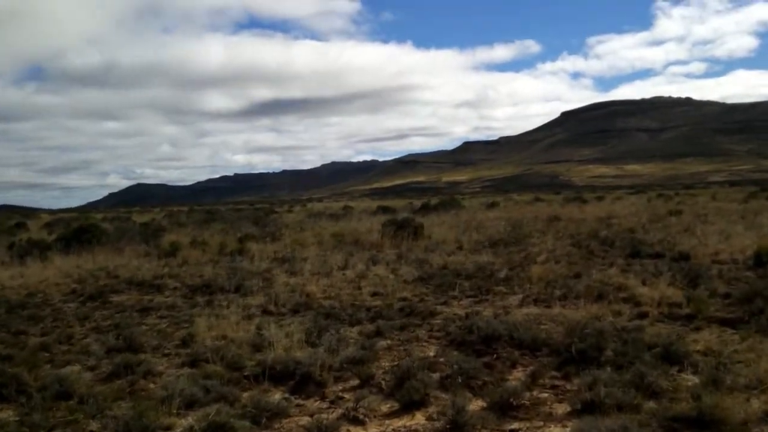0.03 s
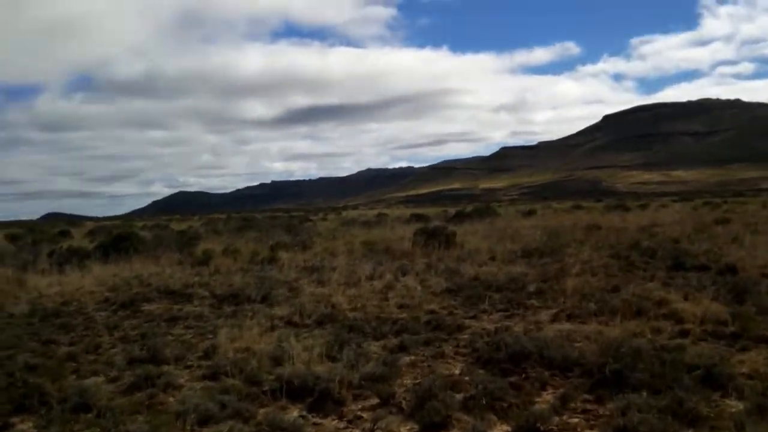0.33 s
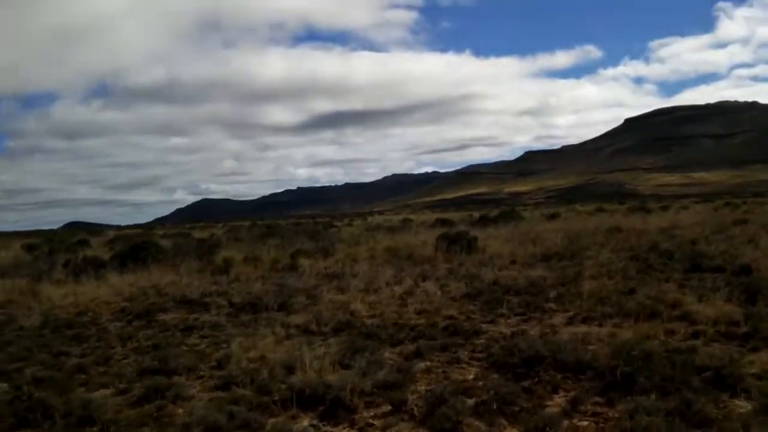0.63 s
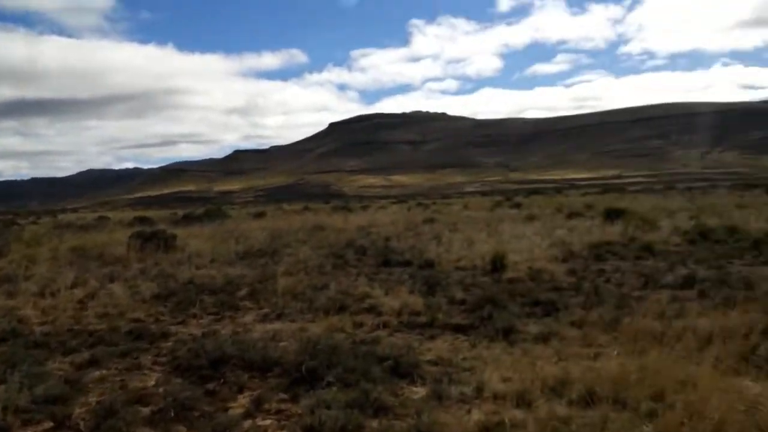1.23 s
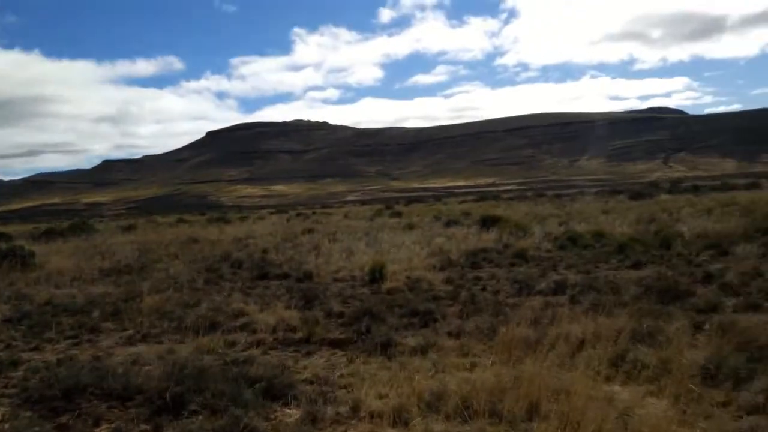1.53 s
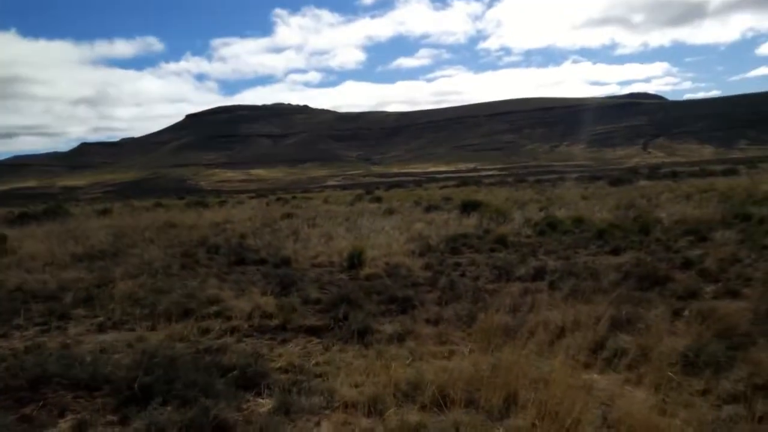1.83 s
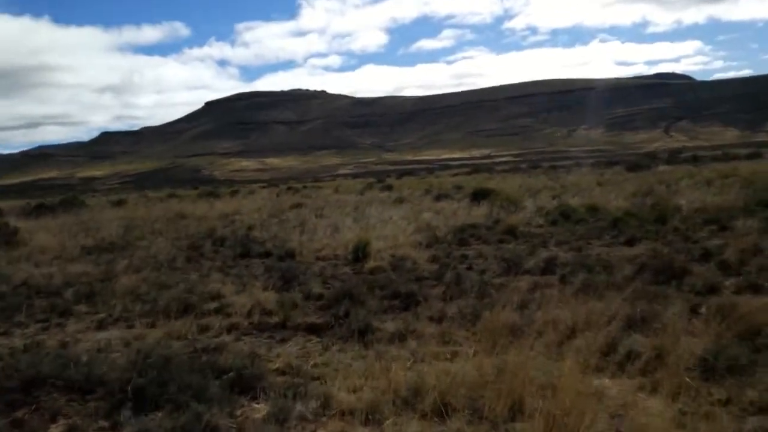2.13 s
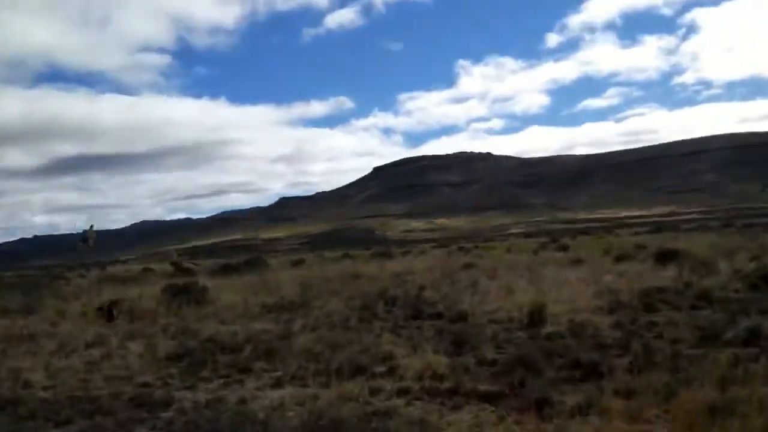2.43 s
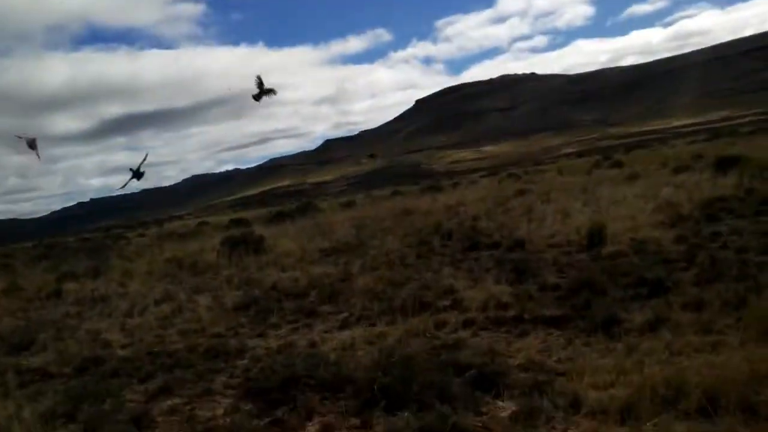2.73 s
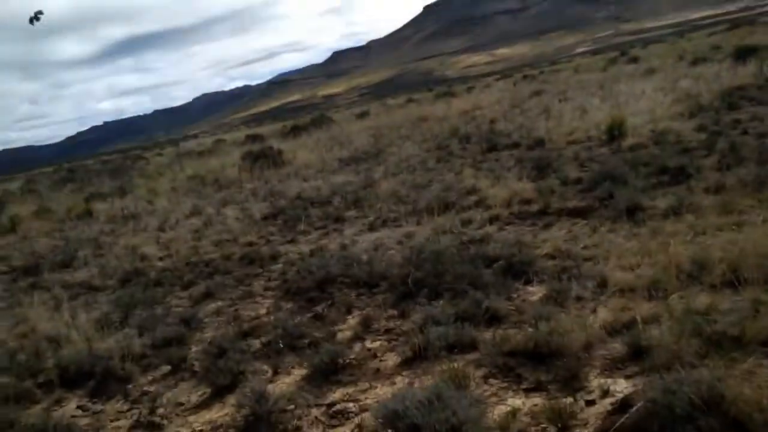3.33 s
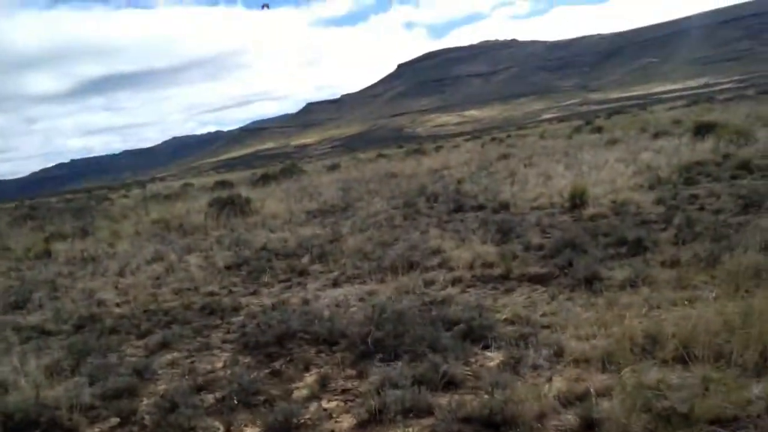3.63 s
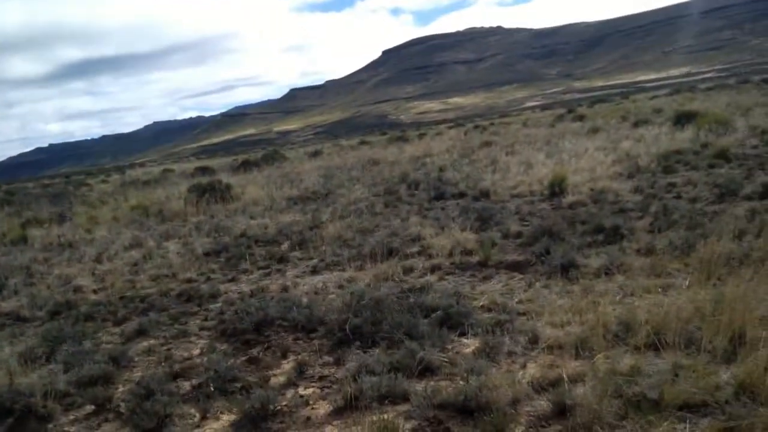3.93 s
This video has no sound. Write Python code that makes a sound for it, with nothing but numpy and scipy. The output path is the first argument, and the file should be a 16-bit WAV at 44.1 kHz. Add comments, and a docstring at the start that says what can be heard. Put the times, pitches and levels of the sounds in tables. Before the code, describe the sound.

Two loud, close gunshots end the scene in open scrubland. Before them, wind gusts buffet the microphone and dry grass rustles, then a flock of birds bursts up with clapping wings and shrill squeals.

```python
"""Open scrubland at the two ports of a hand-held microphone. First, turbulent gusts buffet the ports while
dry grass rustles and snaps. At about 2 s a covey of birds bursts up: wing strokes clap the air, feathers
whirr and shrill squeals overlap. At 3.5 s and 3.9 s two close gunshots set the ports ringing and
overload the microphone; each blast rolls back as a reflection from the slopes."""
import sys
import numpy as np
from scipy import signal
from scipy.fft import rfft, irfft
from scipy.io import wavfile
from scipy.ndimage import uniform_filter1d, map_coordinates

SR = 44100
rng = np.random.default_rng(int(sys.argv[2]) if len(sys.argv) > 2 else 0)


def file_out(sig):
    """Save sig as 16-bit WAV at sys.argv[1]."""
    # one column per channel
    cols = np.atleast_2d(sig).T
    # limit, then scale
    lim = np.clip(cols, -1, 1)
    pcm = np.round(lim * 32767).astype(np.int16)
    wavfile.write(sys.argv[1], SR, pcm)


N = 176400
T = np.arange(N) / SR
BINS_HZ = np.arange(N // 2 + 1) * SR / N

def undb(db):
    """Amplitude ratio of a level in decibels."""
    return 10 ** (np.asarray(db) / 20)

def unit(x):
    """Normalisation to rms 1."""
    return x / np.sqrt(np.mean(x ** 2))

def even(x, size):
    """Division by the running rms over `size` samples steadies a noise."""
    return x / np.sqrt(uniform_filter1d(np.mean(x ** 2, axis=0), size=size))

def curve(rows, column=1):
    """Linear interpolation of a table column in time."""
    rows = np.array(rows)
    return np.interp(T, rows[:, 0], rows[:, column])

def colour(x, spectrum):
    """Spectral shaping by (f/Hz, level/dB) points, conserving the power of white noise."""
    hz, db = np.array(spectrum).T
    gain = undb(np.interp(np.log(np.maximum(BINS_HZ, 1)), np.log(hz), db))
    return irfft(rfft(x) * unit(gain), N)

def noise(spectrum, correlation=0):
    """Partially coherent coloured noise at the two ports."""
    white = rng.standard_normal((3, N))
    return colour(np.sqrt(1 - correlation) * white[:2] + np.sqrt(correlation) * white[2], spectrum)

def walk(rate):
    """Smooth random modulation of rms 1, through `rate` values a second."""
    steps, coarse = rng.standard_normal(4000), T[::16]
    return unit(np.interp(T, coarse, map_coordinates(steps, [coarse * rate], order=3, mode="wrap")))

def flicker(rate, depth_db):
    """Bounded random amplitude modulation of rms 1."""
    return unit(undb(depth_db * np.tanh(walk(rate))))

def patchy(x, centres_hz, rate, depth_db):
    """Independent amplitude modulation of neighbouring bands."""
    spectrum = rfft(x)
    bands = (irfft(spectrum * np.interp(BINS_HZ, centres_hz, row), N) for row in np.eye(len(centres_hz)))
    return sum(band * unit(undb(depth_db * walk(rate))) for band in bands)

def swell(s, rise, hold, fall):
    """Envelope: exponential growth until time s, a plateau, exponential decay."""
    return np.exp(np.minimum(T - s, 0) / rise - np.maximum(T - s - hold, 0) / fall)

def bump(s, width):
    """Gaussian envelope centred on time s."""
    return np.exp(-.5 * ((T - s) / width) ** 2)

def swing(s, hz):
    """Bipolar pressure pulse of peak 1: rarefaction, then compression."""
    u = 2 * np.pi * hz * (T - s)
    return u * np.exp(.5 - .5 * u ** 2)

def ports(x, lag_s):
    """Path difference: a positive lag delays the right port."""
    return np.array([x, map_coordinates(x, [(T - lag_s) * SR], order=3)])

# Gust envelopes: t/s, relative rumble level/dB, relative buffet level/dB
GUSTS = [(0, -21.5, -30.5), (.14, -35, -41), (.23, -21.5, -22.5), (.32, -32.5, -44), (.45, -24, -28),
         (.56, -24.5, -24), (.65, -29.5, -41.5), (.74, -25.5, -25), (.92, -23.5, -24.5), (1.05, -22, -25),
         (1.22, -27.5, -38), (1.41, -27.5, -40.5), (1.47, -35, -51), (1.55, -28, -40), (1.63, -32, -49.5),
         (1.79, -34, -46), (1.87, -41, -53), (2.05, -38, -43.5), (2.22, -32, -35.5), (2.62, -28.5, -36.5),
         (2.84, -29, -44), (2.91, -23, -27.5), (3.11, -35.5, -47.5), (3.27, -32.5, -37.5), (3.5, -41, -62),
         (3.59, -56, -55), (3.74, -30, -31.5), (3.95, -41.5, -38)]
# Single eddies: t/s, relative level/dB
THUMPS = [(0.18, -42), (.212, -33.5), (0.255, -24), (0.348, -34), (0.455, -32), (0.485, -26.5), (.695, -31),
          (0.717, -20), (0.758, -17), (.818, -24), (0.848, -19), (0.906, -18.5), (0.95, -20), (1.014, -15),
          (1.073, -18), (1.11, -23.5), (1.195, -43), (1.333, -32), (1.668, -29.5)]
# Wind spectra: f/Hz, relative level/dB
RUMBLE_SPECTRUM = [(12, -23.5), (25, -14.5), (45, -0.5), (90, -2), (140, -6.5), (220, -13), (400, -42.5),
                   (900, -92)]
BUFFET_SPECTRUM = [(70, -34.5), (130, -6), (200, 1), (320, -0.5), (480, -11), (800, -26), (1400, -47),
                   (2900, -55.5), (3800, -67), (9000, -76), (15000, -77)]
THUMP_SPECTRUM = [(30, -9.5), (90, 1.5), (200, 3), (380, 0), (550, -8.5), (900, -26), (1500, -46.5),
                  (4000, -74)]
AIR_SPECTRUM = [(100, 6), (600, 0), (1500, -9.5), (3000, -21), (5000, -28), (10000, -30.5), (15000, -36.5)]

def wind():
    """Turbulent pressure fluctuations, partly independent at each port, over a steady rush of air."""
    eddy_drive = 0.74 * walk(60) + 0.79 * np.array([walk(110), walk(110)])
    eddies = unit(undb(7.5 * np.tanh(eddy_drive)))
    rumble = even(noise(RUMBLE_SPECTRUM, correlation=0.13), size=3000) * undb(curve(GUSTS) + 6.5)
    rumble *= flicker(rate=30, depth_db=3.1)
    buffet = even(noise(BUFFET_SPECTRUM, correlation=0.25), size=1500) * undb(curve(GUSTS, 2) + 2.5)
    impacts = sum(undb(db + 3.5) * swell(s, rise=0.004, hold=0.0049, fall=0.011) for s, db in THUMPS)
    thumps = even(noise(THUMP_SPECTRUM, correlation=0.31), size=500) * impacts
    return rumble + buffet * eddies + thumps + noise(AIR_SPECTRUM) * undb(-53.5)

# Grass brushing past: t/s, Gaussian width/s, relative level/dB
SCUFFS = [(0.247, 0.055, -56.5), (0.378, 0.055, -56.5), (0.521, 0.025, -52), (0.788, 0.021, -64.5),
          (.93, 0.038, -58), (1.03, 0.02, -53), (1.13, 0.038, -59), (1.25, 0.022, -50), (1.384, 0.039, -55),
          (1.453, 0.013, -53.5), (2.01, 0.038, -56.5), (2.316, 0.052, -36.5)]
# Rustle spectrum: f/Hz, relative level/dB
GRASS_SPECTRUM = [(600, 4), (1400, 2.5), (2000, -4), (2900, -3), (3500, -16.5), (6000, -29), (12000, -31),
                  (16000, -37)]

def grass(blades_per_s=1100):
    """Shot noise: random impulses from dry blades add up to uneven crunches."""
    grains = unit(rng.standard_normal((2, N)) * (rng.random(N) < blades_per_s / SR))
    rustle = patchy(colour(grains, GRASS_SPECTRUM), np.linspace(1200, 3600, 6), rate=35, depth_db=4)
    envelope = sum(undb(db + 2) * bump(s, width) for s, width, db in SCUFFS)
    return rustle * flicker(rate=120, depth_db=1.5) * envelope

# Dry stems snapping: t/s, centre f/Hz, level/dB
SNAPS = [(0.173, 1350, -40), (0.443, 1920, -53), (1.04, 6060, -57.5), (1.094, 2530, -54),
         (1.234, 4180, -50), (1.237, 1900, -51), (1.459, 2700, -51), (1.586, 5800, -61.5),
         (1.737, 1500, -50), (1.761, 1440, -56), (1.98, 4200, -51), (1.98, 2010, -41.5),
         (2.099, 5500, -41.5), (2.136, 5300, -49)]

def stems():
    """Brittle fracture: each stem gives a rapidly damped burst of narrow-band noise."""
    out = 0
    for s, hz, db in SNAPS:
        peak = [(hz / 2, -19), (hz * 0.79, -13), (hz, 0), (hz * 1.2, -15), (hz * 2, -28), (hz * 4, -46)]
        out += noise(peak, correlation=0.5) * undb(db) * swell(s, rise=0.00034, hold=0.0011, fall=0.0052)
    return out

# Wing claps: t/s, relative level/dB
CLAPS = [(2.041, -43.5), (2.094, -30), (2.125, -49), (2.151, -29.5), (2.237, -28.5), (2.264, -36),
         (2.295, -27), (2.325, -23.5), (2.353, -25), (2.375, -34), (2.396, -25), (2.442, -23.5),
         (2.453, -23.5), (2.494, -28), (2.51, -18.5), (2.527, -29), (2.549, -31), (2.567, -26),
         (2.611, -29), (2.626, -33), (2.647, -21.5), (2.666, -28), (2.706, -27.5), (2.724, -28),
         (2.766, -29), (2.795, -27.5), (2.826, -25), (2.856, -30.5), (2.887, -33.5), (2.916, -32.5),
         (2.948, -32), (2.972, -28.5), (3.007, -26.5), (3.029, -25), (3.07, -27.5), (3.081, -33),
         (3.091, -24.5), (3.137, -27), (3.152, -34), (3.196, -28.5), (3.253, -31.5), (3.273, -30.5),
         (3.314, -29.5), (3.33, -32.5), (3.372, -33.5), (3.388, -29), (3.417, -38), (3.447, -30.5),
         (3.472, -28)]
# Whirr of the covey: t/s, level/dB
WHIRR = [(1.9, -71), (2.08, -44), (2.2, -35), (2.32, -37), (2.6, -36), (2.95, -41), (3.17, -43),
         (3.45, -41), (4, -44)]
# Wing spectra: f/Hz, relative level/dB
SLAP_SPECTRUM = [(100, -11), (250, -4.5), (450, -16.5), (650, 8.5), (900, 7), (1100, -4), (1400, -11),
                 (2300, -18), (5000, -22.5), (7200, -33), (8800, -63)]
FEATHER_SPECTRUM = [(120, -8), (250, 9.5), (550, 1), (950, 7), (1400, -6.5), (2200, -2.5), (4000, -17.5),
                    (6800, -18.5), (8200, -47), (14000, -50)]

def wings(clap_hz=932, width_s=0.0021):
    """Impulsive air displacement: each downstroke radiates a wave packet and a slap, over feather noise."""
    packets = np.zeros(N)
    for (s, db), (detune, phase) in zip(CLAPS, rng.uniform(-1.03, 1, (len(CLAPS), 2))):
        hz = clap_hz * (1 + 0.15 * detune)
        carrier = np.sqrt(2) * np.sin(2 * np.pi * hz * (T - s) + np.pi * phase)
        packets += undb(db - 2.5) * bump(s, width_s) * carrier
    feathers = noise(FEATHER_SPECTRUM, correlation=0.5)
    flutter = patchy(feathers, np.geomspace(500, 8000, 5), rate=110, depth_db=4)
    whirr = flutter * flicker(rate=110, depth_db=4) * undb(curve(WHIRR))
    strokes = sum(undb(db - 7.5) * bump(s, 0.0033) for s, db in CLAPS)
    slaps = even(noise(SLAP_SPECTRUM, correlation=0.81), size=300) * strokes
    return ports(packets, lag_s=-0.000043) + slaps + whirr

def squeal(start, length, pitches, rough, octave_db):
    """Random frequency and amplitude modulation roughen a gliding tone and its second harmonic."""
    u = np.arange(int(length * SR)) / int(length * SR)
    rough = np.clip(rough, 0, 1)
    jitter, shimmer = [np.interp(u * length * 700, np.arange(200), r)
                       for r in rng.standard_normal((2, 200))]
    glide_hz = np.polyval(np.polyfit([0, .5, 1], pitches, 2), u)
    phase = 2 * np.pi * np.cumsum(glide_hz * (1 + 0.045 * rough * jitter)) / SR
    tone = np.sqrt(2) * (np.sin(phase) + undb(octave_db) * np.sin(2 * phase))
    out, i = np.zeros(2 * N), int(start * SR)
    out[i:i + len(u)] = tone * np.sin(np.pi * u) ** 0.52 * (1 + 0.9 * np.sqrt(rough) * shimmer)
    return out[:N]

# Near cries: t/s, duration/s, start, middle and end f/Hz, relative level/dB, roughness, octave level/dB
SQUEALS = [(2.356, 0.0507, 3100, 3440, 3420, -32, 0.67, -0.5),
           (2.37, .036, 3747, 3950, 3820, -29, 0.1, -23), (2.416, .05, 4260, 3900, 3780, -34, 0.8, -27),
           (2.528, 0.035, 4070, 4080, 3560, -34.5, .3, -1),
           (2.529, 0.066, 4550, 4420, 4280, -29.5, 0.5, -24),
           (2.607, 0.035, 4020, 3920, 4020, -16.5, 0, -11.5),
           (2.644, 0.028, 4590, 4460, 3980, -30.5, 1.1, -21),
           (2.674, 0.046, 3646, 3420, 3380, -29.5, .5, -2), (2.688, 0.049, 4300, 4010, 3470, -32, .8, -26),
           (2.777, 0.037, 3800, 4020, 4020, -32, 0.34, -18),
           (2.838, .035, 4690, 4350, 4570, -27.5, 0.3, -17),
           (2.878, 0.021, 5030, 4910, 4920, -21, 0.1, -12), (2.901, 0.027, 3755, 3783, 4110, -25, .2, -1),
           (2.923, .045, 4480, 4460, 4540, -31, 0.7, -15),
           (2.972, 0.057, 3610, 3430, 3500, -33.5, 0.46, -12),
           (3.057, 0.019, 4180, 4150, 4120, -23.5, 0.4, -2), (3.08, .042, 4180, 4030, 3870, -21, .15, -8),
           (3.182, 0.044, 4060, 4100, 4280, -35, 0.2, -18), (3.253, .045, 3420, 3350, 3450, -33.5, 0.74, 4),
           (3.276, .045, 3800, 4070, 4380, -29, .6, 1), (3.319, 0.037, 4200, 4050, 4080, -24, 0.31, -17),
           (3.339, 0.034, 4400, 4690, 4280, -23.5, 0.07, -21),
           (3.353, .035, 4100, 3710, 3040, -34, 0.58, -16), (3.474, 0.076, 4300, 4320, 4400, -28, .5, -22),
           (3.465, 0.069, 3790, 3700, 3650, -31.5, 0.45, 0.5),
           (3.618, 0.051, 4600, 4520, 4360, -40, 0.4, -20), (3.737, 0.069, 4440, 4290, 4270, -27, 0.2, -22),
           (3.8, 0.087, 4480, 4570, 4400, -30, 0, -24)]
# Thin high cries: t/s, duration/s, start, middle and end f/Hz, level/dB
SQUEAKS = [(2.661, 0.063, 10700, 10540, 10300, -60.5), (2.835, 0.053, 10900, 11260, 11800, -66),
           (3.029, 0.04, 10250, 10200, 10200, -63)]
# Envelope of the rest of the covey: t/s, relative level/dB
CHATTER = [(2.13, -67), (2.21, -32.5), (2.26, -32.5), (2.3, -50), (2.385, -34.5), (2.48, -30.5),
           (2.58, -27.5), (2.68, -28.5), (2.76, -33), (2.86, -28.5), (2.95, -27), (3.03, -31),
           (3.125, -32.5), (3.165, -43.5), (3.2, -38), (3.24, -33), (3.3, -31), (3.43, -35), (3.49, -29.5),
           (3.58, -40), (3.69, -43), (3.73, -26), (3.77, -41.5), (3.82, -32), (3.94, -52), (4, -38)]
# Treble roll-off that dulls the cries above about 8.5 kHz: f/Hz, relative level/dB
CRY_TREBLE_CUT = [(2000, 11), (5000, 1.5), (8400, -7), (9000, -24), (10000, -32), (14000, -43)]
# Hoarse noise spectrum: f/Hz, relative level/dB
HOARSE_SPECTRUM = [(1800, -32), (2600, -1), (3100, 4.5), (4000, 7.5), (4700, 3), (5300, -5), (7200, -9),
                   (8300, -51), (9500, -59)]

def birds(chatter_hz=3695, cry_s=0.047):
    """Incoherent superposition: many rough cries merge into hoarse chatter behind the near squeals."""
    near = sum(undb(db - 5.5) * squeal(s, length, pitches, rough, octave_db)
               for s, length, *pitches, db, rough, octave_db in SQUEALS)
    thin = sum(undb(db) * squeal(s, length, pitches, rough=0.24, octave_db=-40)
               for s, length, *pitches, db in SQUEAKS)
    starts = np.linspace(CHATTER[0][0], CHATTER[-1][0], 36)
    crowd = 0
    for lag_s in (-.00014, .00012, .00028):  # three directions
        cries = 0
        for s in starts:
            shift, stretch, detune = rng.uniform(-1, 1, 3)
            pitches = chatter_hz * np.exp(0.24 * detune + 0.085 * rng.uniform(-1, 1, 3))
            length = cry_s * (1 + 0.322 * stretch)
            cries += squeal(s + .02 * shift, length, pitches, rough=0.92, octave_db=-11)
        crowd += ports(cries, lag_s)
    hiss = noise(HOARSE_SPECTRUM, correlation=0.05)
    hoarse = patchy(hiss, np.linspace(2500, 8000, 8), rate=70, depth_db=4.5)
    envelope = undb(curve(CHATTER)) * (T > CHATTER[0][0])
    voices = ports(near, lag_s=-0.000038) + envelope * unit(crowd) * undb(-5) / np.sqrt(2)
    return colour(voices, CRY_TREBLE_CUT) + thin + envelope * hoarse * undb(-6.5)

# Modes of the overloaded ports, one list per shot: f/Hz, left level/dB, right level/dB
PORT_MODES = [
    [(498, -12.5, -35), (800, -31, -22), (1120, -42, -16), (1360, -44, -14), (1664, -27, -27),
     (1930, -51, -17.5), (2440, -40, -31), (4800, -18.5, -45), (6100, -28, -44), (6700, -46, -23.5),
     (12000, -25, -40)],
    [(199.1, -26, -16.5), (2046, -21.5, -39), (4025, -12, -37), (4430, -17.5, -38), (7450, -37, -57)],
]

def port_ringing(shot, front):
    """Resonance: the shock front excites wavering modes, of different strength at each port."""
    ring = 0
    for hz, left_db, right_db in PORT_MODES[shot]:
        phase = 2 * np.pi * (hz * T + rng.random()) + 0.55 * walk(300)
        ring += undb([[left_db], [right_db]]) * np.sqrt(2) * np.sin(phase)
    return ring * swell(front, rise=0.004, hold=0.0208, fall=0.0013)

# Spectrum of the reflected blast: f/Hz, relative level/dB
ROLL_SPECTRUM = [(60, -38), (130, -8), (230, 0.5), (360, -7), (550, -4), (800, -10), (1150, -15),
                 (1700, -32.5), (4500, -33.5), (9000, -34.5), (15000, -49.5)]

def reflections(s, hold, delay_s=0.097):
    """Reflection: ground reverberation and the slopes' echo add in power; a bright slap marks the echo."""
    ground = undb(-23.5) * swell(s, rise=0.0058, hold=hold, fall=0.14)
    slopes = undb(-20.5) * swell(s + delay_s, rise=0.018, hold=0.059, fall=0.058)
    roll = even(noise(ROLL_SPECTRUM, correlation=0.53), size=1500) * np.hypot(ground, slopes)
    roll *= flicker(rate=45, depth_db=2.8)
    slap = noise([(1000, -34), (2000, 3.5), (2700, -10.5), (9000, -19.5)], correlation=0.19)
    return roll + slap * undb(-30.5) * swell(s + delay_s, rise=0.012, hold=0.0061, fall=0.011)

# Shots: front t/s, boom t/s, boom level/dB, boom hold/s, crack level/dB
SHOTS = [(3.507, 3.523, -11.5, 0.013, -11), (3.861, 3.879, -12, 0.014, -16.5)]
# Pressure swings within the blasts: t/s, centre f/Hz, peak level/dB
PUNCHES = [(3.5124, 476, -11), (3.5319, 275, -5.5), (3.8848, 316, -2.5), (3.8924, 740, -8.5)]
# Blast spectra: f/Hz, relative level/dB
BOOM_SPECTRUM = [(30, -7), (120, -22), (220, 8), (450, -3.5), (950, -2), (1600, -8.5), (2600, -13),
                 (5000, -27.5)]
CRACK_SPECTRUM = [(800, -5), (2000, -3.5), (3200, -3.5), (5500, -3.5), (8000, -10.5), (13000, -12.5),
                  (16000, -22)]

def gunshots():
    """Blast waves: a steep front rings the ports; boom, crack, pressure swings and reflections follow."""
    out = sum(undb(db) * swing(s, hz) for s, hz, db in PUNCHES)
    for shot, (front, s, boom_db, hold, crack_db) in enumerate(SHOTS):
        arrived = np.clip((T - front) / 0.0044, 0, 1)
        ring = port_ringing(shot, front)
        boom = even(noise(BOOM_SPECTRUM, correlation=0.16), size=300) * undb(boom_db)
        boom *= swell(s, rise=0.0058, hold=hold, fall=0.021)
        crack = noise(CRACK_SPECTRUM) * undb(crack_db) * unit(undb(2 * walk(500)))
        crack *= swell(s, rise=0.01, hold=0.0081, fall=0.012)
        surge = undb(-24.5) * swing(s, hz=22)
        out = out + arrived * (ring + boom + crack + surge + reflections(s, hold))
    return out

def scene():
    """Linear superposition of all sources at the two ports."""
    return wind() + grass() + stems() + wings() + birds() + gunshots()

def record(dry, cutoff_hz=15800):
    """Saturation and band limiting: the microphone rounds the loudest peaks and cuts the top treble."""
    saturated = dry / (1 + dry ** 6) ** (1 / 6)
    return signal.sosfilt(signal.ellip(10, .2, 70, cutoff_hz, fs=SR, output="sos"), saturated)

dry = scene()
out = record(dry)
file_out(out)
```